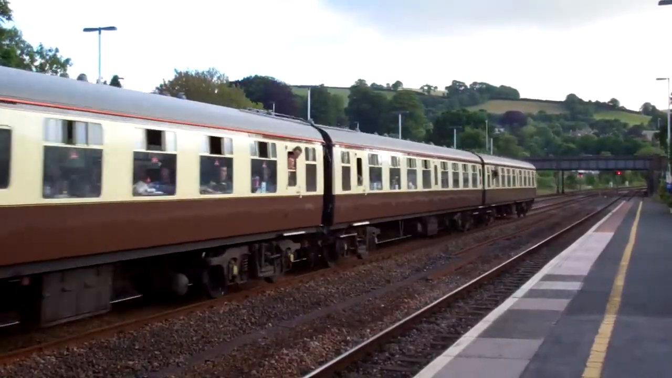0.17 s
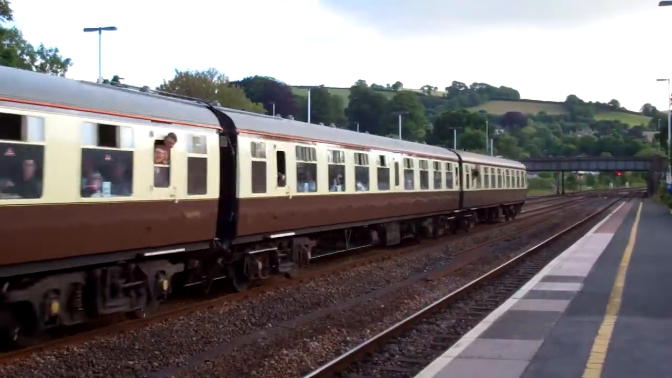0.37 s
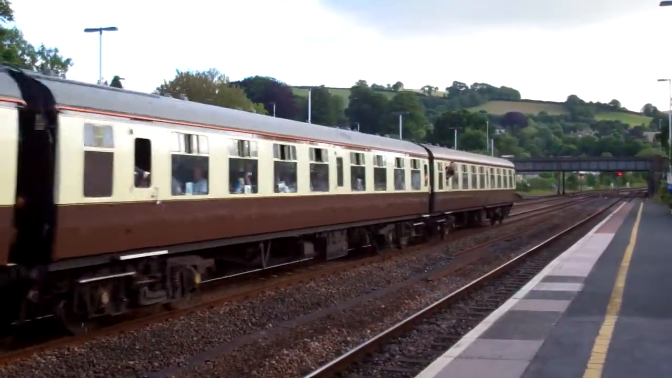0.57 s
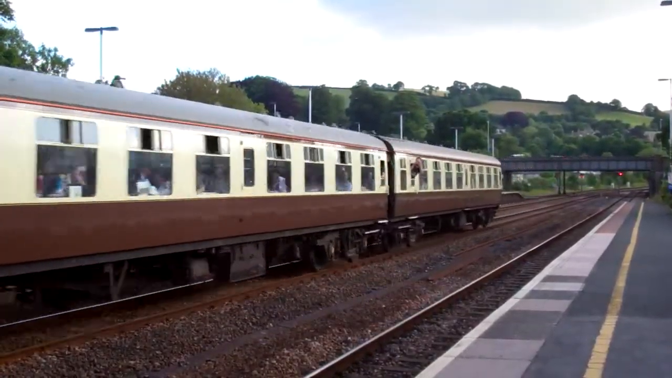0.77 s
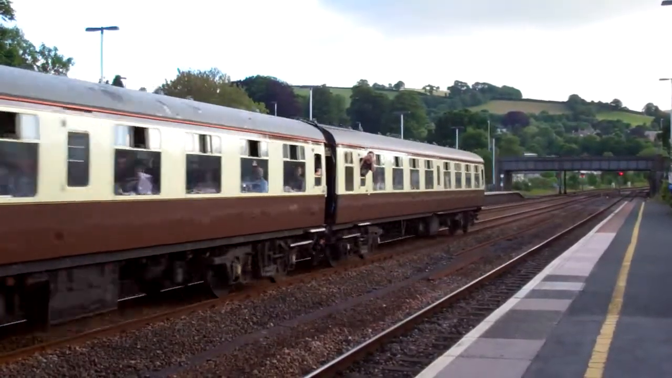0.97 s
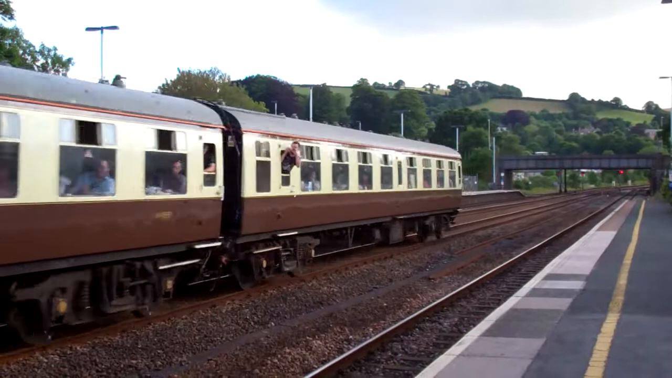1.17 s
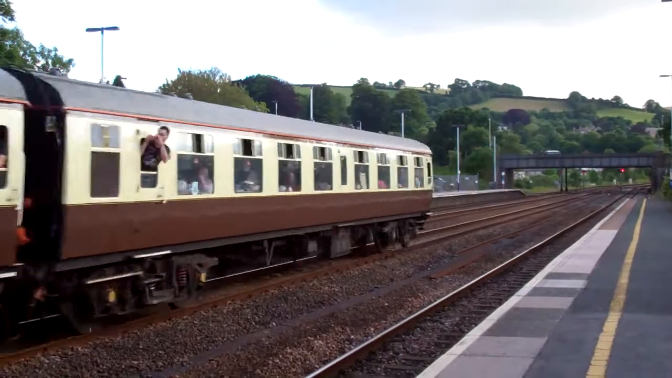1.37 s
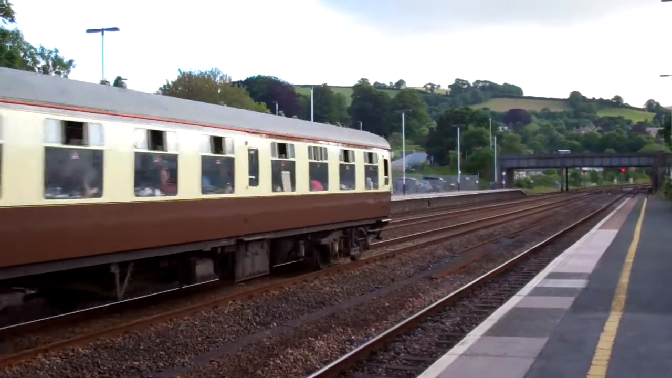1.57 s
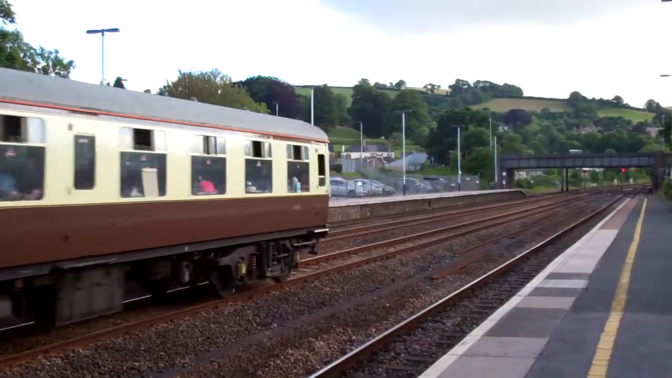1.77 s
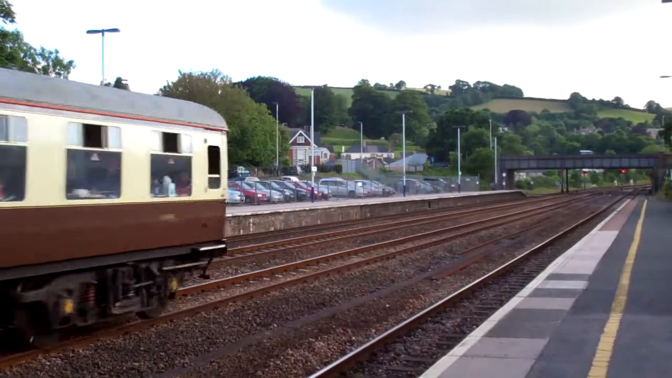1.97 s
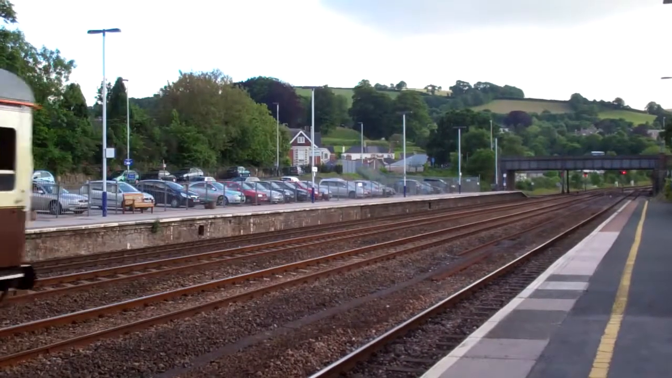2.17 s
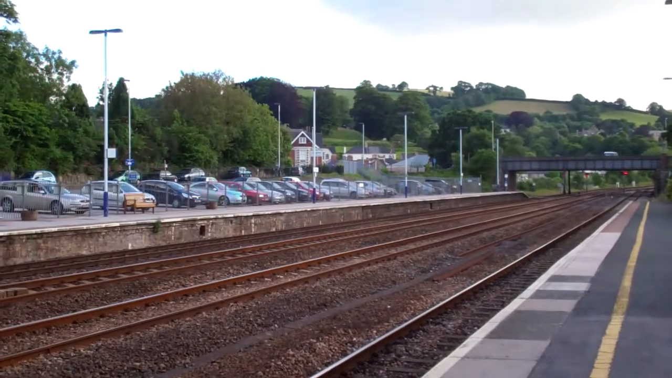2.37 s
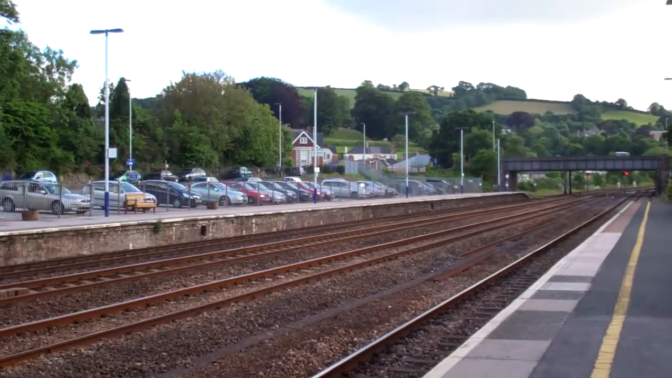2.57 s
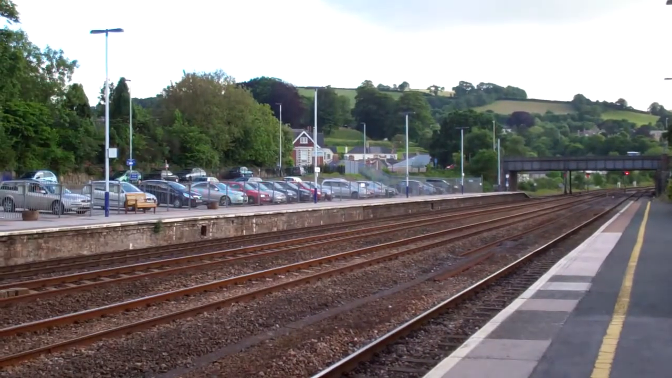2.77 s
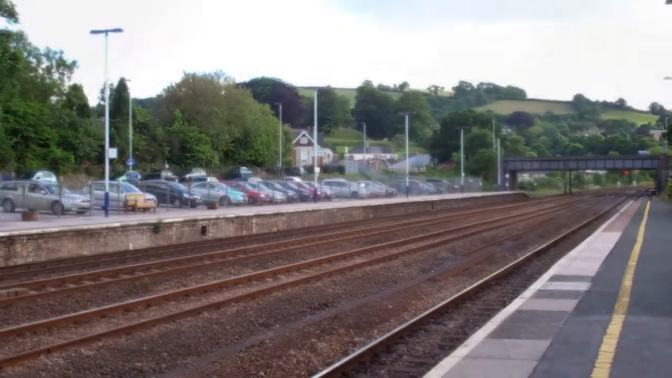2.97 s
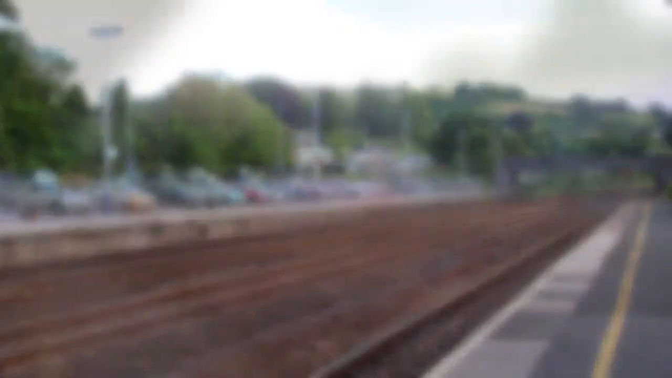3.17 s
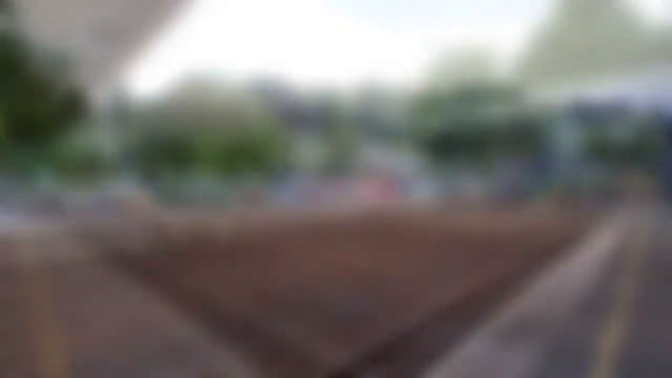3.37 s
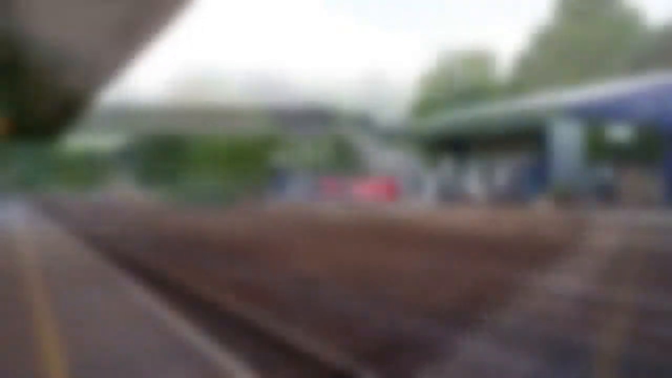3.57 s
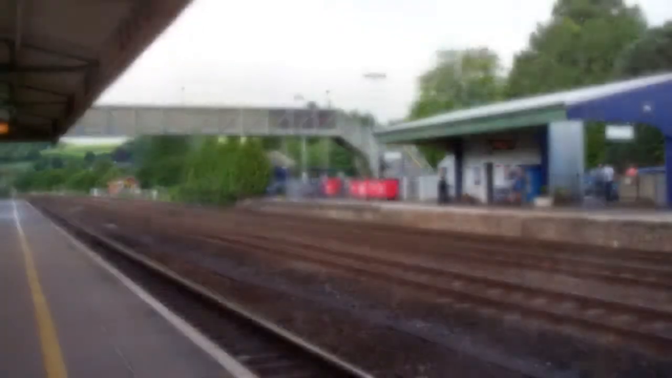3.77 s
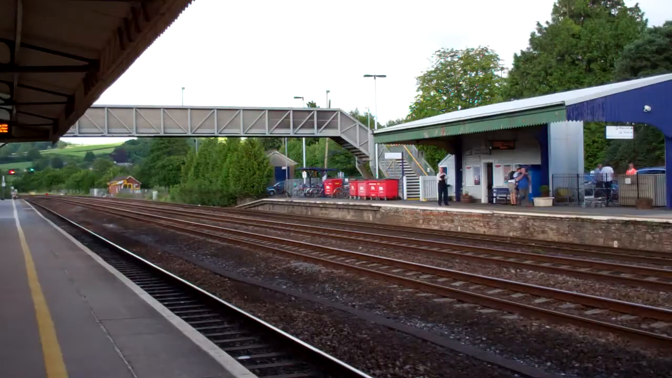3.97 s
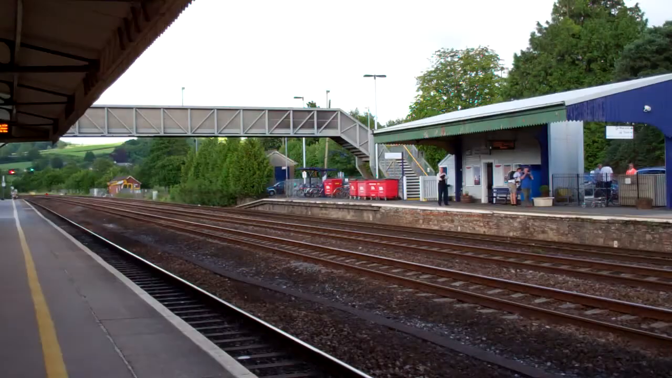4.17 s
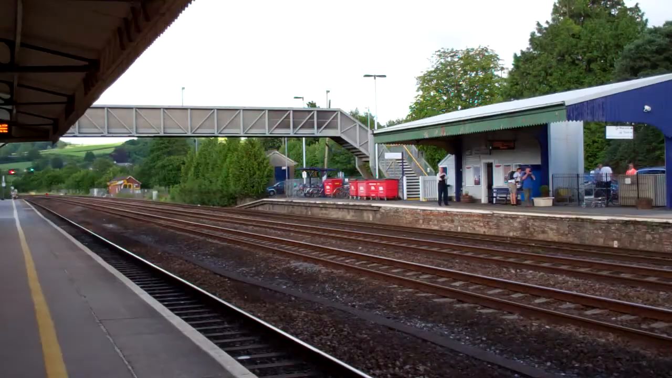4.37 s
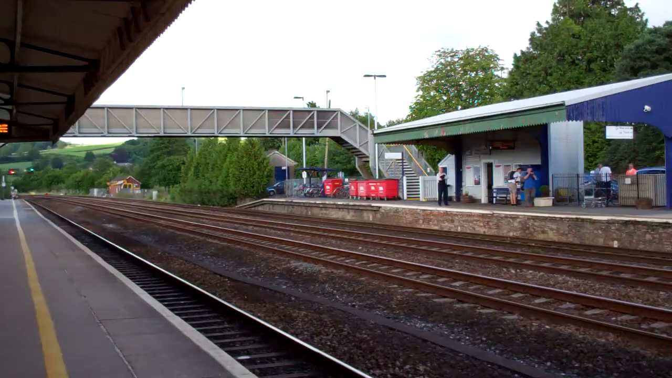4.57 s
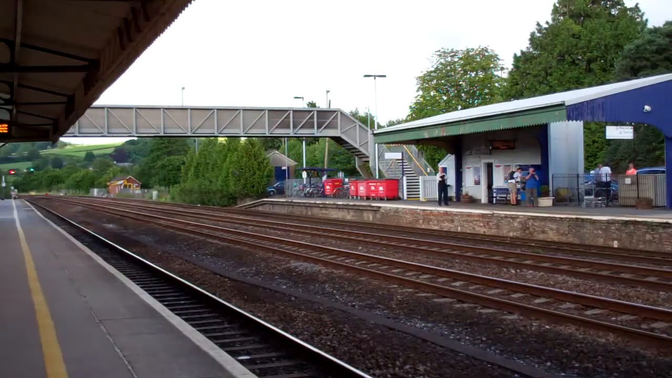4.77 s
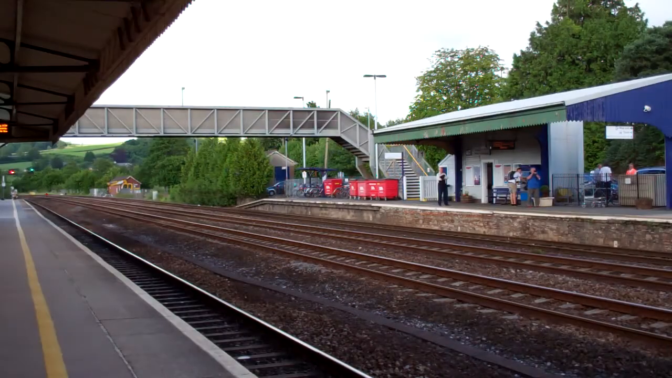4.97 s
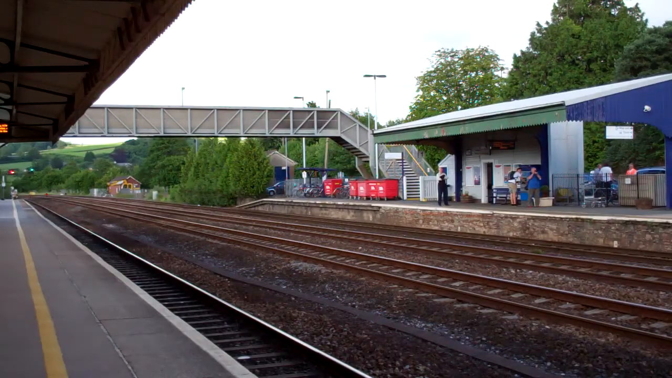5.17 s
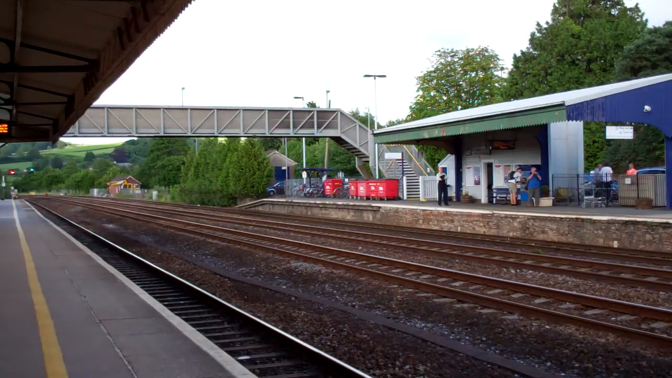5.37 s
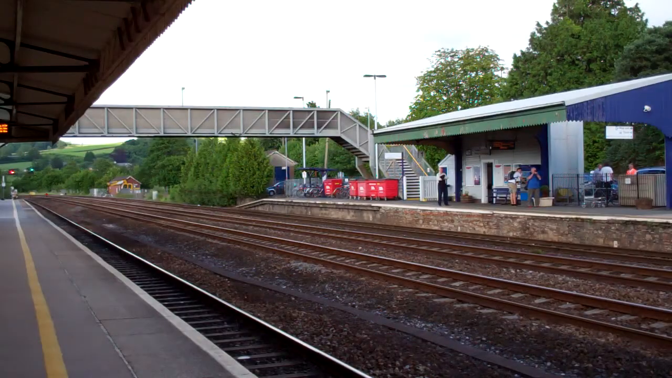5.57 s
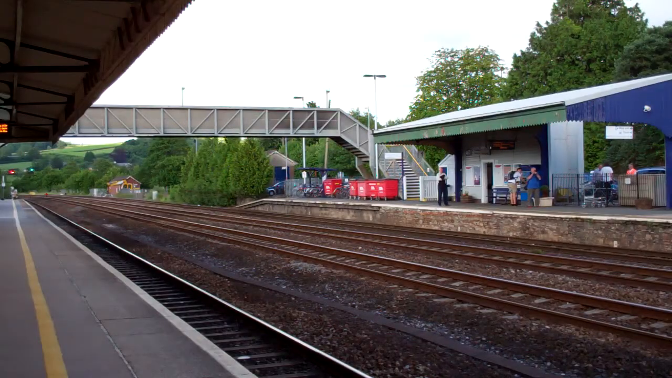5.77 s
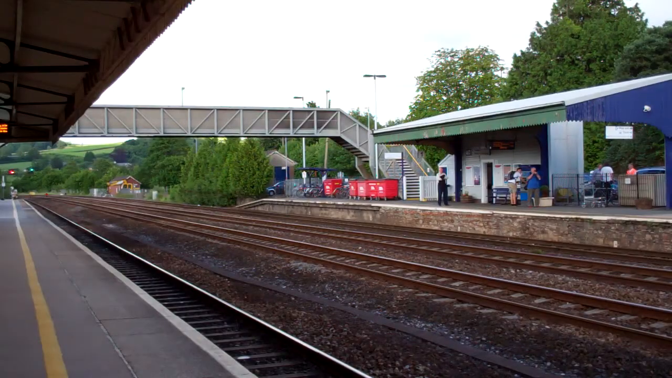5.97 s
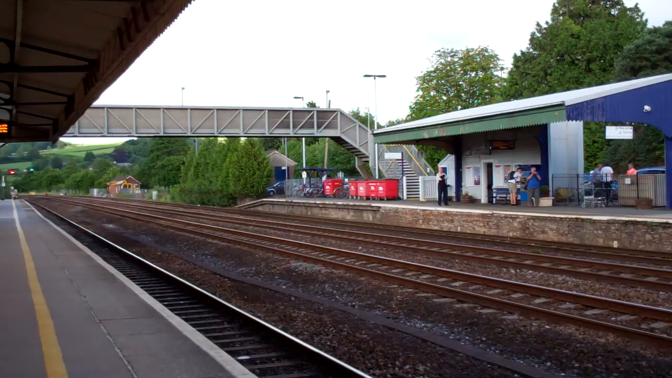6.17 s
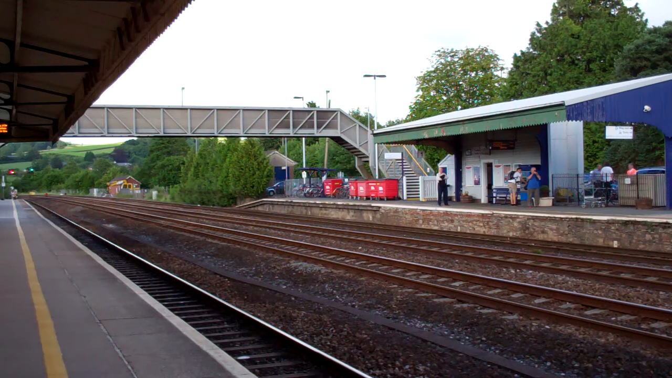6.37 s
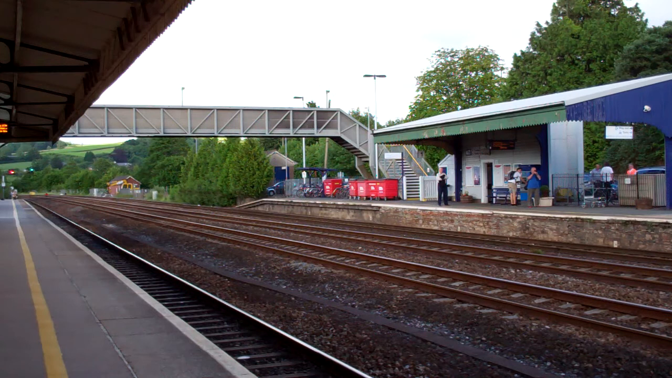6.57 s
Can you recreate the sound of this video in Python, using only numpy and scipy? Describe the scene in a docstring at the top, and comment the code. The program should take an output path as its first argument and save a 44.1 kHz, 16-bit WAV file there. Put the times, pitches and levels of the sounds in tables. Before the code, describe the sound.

At 0 s coaches are already rolling past close by on the left, a loud, rough mid-low roar that wavers as the wheels pass, with the rail singing in swells. Thin, very high flange squeals stutter through it, strongest in the first 0.4 s and around 1.05 and 1.6-1.9 s, with more to about 2.7 s. A faint scrape glides upward at 1.2 s; a wheel clanks on a joint at 2.3 s. From 2.7 s the roar drops, gone by 3.8 s, while high hiss enters, spurting at 3.3-3.8 s. A quieter open station remains: a diesel approaches from the right, its broad roar and low wavering hums growing until the end at 6.6 s. A bird gives two tiny falling notes at 4.3 s. Wind thumps hit the microphone near 5.75 s on the left and again at 5.93 s, with a dull tap and short rustle around 5.88 s.

```python
"""Coaches roll past a platform from the left: noise shaped by rail and wheel modes roars and wavers.
A flange squeals in bursts of ringing noise; a faint scrape glides up, then a wheel clanks on a rail joint.
The train fades as a quiet station dissolves in: a high hiss with spurts, and a diesel nearing from the right,
made of swelling noise and wavering firing tones. A bird drops two short notes; late on come wind pops on
the microphone ports, a dull tap and a brief treble rustle."""
import sys
import numpy as np
from scipy import signal
from scipy.fft import rfft, irfft, next_fast_len
from scipy.io import wavfile
from scipy.ndimage import uniform_filter1d, map_coordinates

SR = 44100
rng = np.random.default_rng(int(sys.argv[2]) if len(sys.argv) > 2 else 0)


def wrap_up_sound(samples):
    """Save the sound to the file named by the first command line argument, as 16-bit audio."""
    columns = np.atleast_2d(samples).T
    # keep every value between -1 and 1, then stretch to whole-number steps
    tamed = np.clip(columns, -1, 1)
    steps = np.round(tamed * 32767).astype(np.int16)
    wavfile.write(sys.argv[1], SR, steps)


N = 291501
TIME_S = np.arange(N) / SR
LEFT_RIGHT = np.array([[1], [-1]])  # a positive pan in dB lifts the left and lowers the right


def amp(db):
    """dB to gain."""
    return 10 ** (np.asarray(db) / 20)


def unit(x):
    """Scaled to rms 1."""
    return x / np.sqrt(np.mean(x ** 2) + 1e-20)


def along(points, hz):
    """Values between (Hz, value) points, read on a log frequency axis."""
    point_hz, values = np.transpose(points)
    return np.interp(np.log(hz + 1), np.log(point_hz + 1), values)


def curves(rows):
    """One value per sample for each column after the time."""
    seconds, *columns = np.transpose(rows)
    return [np.interp(TIME_S, seconds, column) for column in columns]


def ramp(span):
    """0 before the span in seconds, 1 after it."""
    return np.interp(TIME_S, span, [0, 1])


def wobble(rate):
    """A smooth random curve, rate knots a second."""
    knots = rng.standard_normal(int(N * rate / SR) + 4)
    return map_coordinates(knots, [np.arange(N) * rate / SR])


def filtered(x, response):
    """x times a complex response of frequency."""
    size = next_fast_len(N + 8192)
    spectrum = rfft(x, size) * response(np.fft.rfftfreq(size, 1 / SR))
    return irfft(spectrum, size)[..., :N]


def ports(pair, lag):
    """The left port hears the treble lag seconds after the right; the bass reaches both nearly in step."""
    def response(hz):
        turn = np.pi * hz * lag / (1 + (1000 / (hz + 1)) ** 3)
        return np.exp(-1j * turn * LEFT_RIGHT)
    return filtered(pair, response)


def rush(gain, alike, patchy_db):
    """Stereo noise of rms 1 with time-frequency patches of random gain; alike sets left-right likeness."""
    grains = signal.stft(rng.standard_normal((2, N)), nperseg=512)[2]
    field = uniform_filter1d(rng.standard_normal(grains.shape[1:]), size=5, axis=0)
    field = uniform_filter1d(field, size=8, axis=1)
    pair = signal.istft(grains * amp(patchy_db * unit(field)), nperseg=512)[1][:, :N]

    def mid_side(hz):
        turn = np.arccos(np.clip(along(alike, hz), -1, 1)) / 2
        return gain(hz) * np.array([np.cos(turn), np.sin(turn)])
    mid, side = filtered(pair, mid_side)
    return unit(np.array([mid + side, mid - side]))


def resonant(spectrum, modes, part):
    """Gain of one part of a spectrum, lifted at each mode; neighbouring parts share their edge."""
    low_hz, high_hz = part

    def gain(hz):
        lift = sum(db / (1 + (2 * (hz - centre) / width) ** 2) for centre, width, db in modes)
        share = 1 / (1 + (low_hz / (hz + 1)) ** 12) / (1 + (hz / high_hz) ** 12)
        return amp(along(spectrum, hz) + lift) * np.sqrt(share)
    return gain


def slow_band(pair, width_hz, carrier):
    """Two slow noises on a complex carrier make a narrow band of rms 1 around its pitch."""
    slow = filtered(pair, lambda hz: 1 / (1 + (hz / width_hz) ** 2))
    return unit(np.real((slow[0] + 1j * slow[1]) * carrier))


def tone(hz, waver_hz, waver_db):
    """A sine of rms near 1 whose pitch and strength drift."""
    strength = np.sqrt(2) * amp(waver_db * wobble(8.3))
    return strength * np.sin(2 * np.pi * np.cumsum(hz + waver_hz * wobble(12)) / SR)


# Level of the high hiss: time_s, level_db
SIZZLE_LEVEL = [(2.7, -52), (3.15, -44), (3.9, -46.5), (4.9, -45.5), (6.1, -40.5), (6.61, -41)]
# Colour of the steady hiss: pitch_hz, density_db (per Hz)
SIZZLE_COLOUR = [(9000, -30), (11000, -12), (11700, -6), (12300, -9), (12800, -2.5), (13300, -2),
                 (13750, 0), (14300, -1), (14600, -80)]
# Spurts of hiss: start_s, length_s, level_db
SPURTS = [(3.3, .06, -44), (3.385, .05, -40.5), (3.445, .09, -40.5), (3.6, .02, -41), (3.62, .045, -39),
          (3.73, .05, -44)]
# Colour of the spurts: pitch_hz, density_db (per Hz)
SPURT_COLOUR = [(10000, -30), (12300, -14), (12700, 0), (14300, 0), (14600, -80)]


def sizzle():
    """A steady hiss at the top of the range, stronger on the right, with quick spurts that die away."""
    hiss, spit = (rush(lambda hz: amp(along(colour, hz)), [(13000, .35)], patchy_db=.9)
                  for colour in (SIZZLE_COLOUR, SPURT_COLOUR))
    spurts = sum(amp(db) * (TIME_S > s) * np.exp(-((TIME_S - s) / length) ** 4) for s, length, db in SPURTS)
    flicker_db = .8 * wobble(80)
    return (amp(curves(SIZZLE_LEVEL)[0]) * hiss + spurts * spit) * amp(flicker_db - 1.6 * LEFT_RIGHT)


# A brief broad rustle: centre_s, half_length_s, level_db
RUSTLE = (5.89, 0.033, -43)


def scuff():
    """A short swell of treble noise."""
    s, half_length, db = RUSTLE
    swell = amp(db) * np.exp(-((TIME_S - s) / half_length) ** 2)
    colour = [(1500, -30), (3000, 2), (9500, -6), (11000, -30)]  # pitch_hz, density_db
    return swell * rush(lambda hz: amp(along(colour, hz)), [(5000, .3)], patchy_db=4)


# Wind on a port: centre_s, level_db, port (1 left, -1 right), overshoot_rad
WIND_POPS = [(5.721, -23, -1, .3), (5.75, -11.5, 1, 0.29), (5.858, -24, 1, 0.33), (5.9312, -9, 1, 0.69)]


def wind_pops():
    """An eddy pulls one membrane back and lets it overshoot."""
    out = np.zeros((2, N))
    half = SR // 100
    t = np.arange(-half, half) / SR
    for s, db, port, overshoot in WIND_POPS:
        push = -np.cos(2 * np.pi * 200 * t + overshoot) * np.exp(-(t / 0.0024) ** 2)
        reach = np.array([[1], [.08]])[::int(np.sign(port))]  # the other port feels little of it
        out[:, round(s * SR) - half:][:, :len(t)] += amp(db) * push * reach
    return out


# Falling notes: start_s, length_s, from_hz, to_hz, level_db
BIRD_NOTES = [(4.315, .04, 2750, 2300, -46), (4.375, .04, 2550, 2450, -48)]


def bird():
    """Short falling whistles, each swelling and fading as half a sine."""
    out, t = np.zeros(N), np.arange(SR // 10) / SR
    for s, length, from_hz, to_hz, db in BIRD_NOTES:
        u = np.clip(t / length, 0, 1)
        whistle = np.sin(2 * np.pi * np.cumsum(from_hz + (to_hz - from_hz) * u) / SR)
        out[round(s * SR):][:len(t)] += amp(db) * np.sin(np.pi * u) * whistle
    return out


# A dull knock: start_s, level_db (before a 7 dB trim), pitch_hz (of the strongest partial)
DULL_TAP = (5.879, -13, 956)


def tap():
    """Four close partials start softly together and die by 60 dB in 52 ms."""
    out, t = np.zeros(N), np.arange(SR // 10) / SR
    s, db, hz = DULL_TAP
    partials = ((.7, .6), (.88, .7), (1, 1.5), (1.1, .5))  # pitch ratio, size
    ring = sum(np.sin(2 * np.pi * hz * ratio * t) * size for ratio, size in partials)
    out[round(s * SR):][:len(t)] += amp(db - 7.0 - 60 * t / 0.052) * ring * (1 - np.exp(-t / .0015))
    return out


# A wheel strikes a rail joint: start_s, level_db, pitch_hz, t60_s
JOINT_BLOW = (2.322, -12, 1300, .15)


def clank():
    """One blow rings the rail web."""
    s, db, hz, t60 = JOINT_BLOW
    t = np.clip(TIME_S - s, 0, None)
    return amp(db - 60 * t / t60) * np.sin(2 * np.pi * hz * t) * (1 - np.exp(-t / 0.0028))


# A faint rising scrape: start_s, length_s, from_hz, to_hz, level_db (at the start of the fade)
RISING_SCRAPE = (1.16, .17, 8600, 9800, -40)


def scrape():
    """A narrow band of friction noise that glides upward and loses 5 dB on top of its swell."""
    s, length, from_hz, to_hz, db = RISING_SCRAPE
    u = np.clip((TIME_S - s) / length, 0, 1)
    carrier = np.exp(2j * np.pi * np.cumsum(from_hz + (to_hz - from_hz) * u) / SR)
    swell = amp(db - 5 * u) * np.sqrt(np.sin(np.pi * u).clip(0))
    return swell * slow_band(rng.standard_normal((2, 2, N)), 150, carrier)


# Roar of the nearing locomotive: time_s, level_db
APPROACH_ROAR = [(3.5, -41), (3.9, -36.5), (4.2, -35.5), (4.9, -33), (5.22, -33), (5.32, -31.5),
                 (5.75, -32), (5.92, -30), (6.45, -28.5), (6.61, -26.5)]
APPROACH_REF_DB = -33  # the roar level at which the layer offsets hold


def approach(offset_db, swing):
    """Level in dB of a layer that grows as the locomotive nears."""
    return APPROACH_REF_DB + offset_db + swing * (curves(APPROACH_ROAR)[0] - APPROACH_REF_DB)


def singing_rail(hz, db, width_hz):
    """A narrow band of noise around the rail's strongest mode."""
    return amp(db) * slow_band(rng.standard_normal((2, N)), width_hz, np.exp(2j * np.pi * hz * TIME_S))


def rail_under_locomotive():
    """The rail sings 12 dB under the reference roar and grows 2.2 times as fast in dB as the roar."""
    return singing_rail(934, approach(-12, swing=2.2), width_hz=87)


# Colour of the locomotive noise: pitch_hz, density_db (per Hz)
NEARING_COLOUR = [(15, -57), (30, -31), (100, -12), (160, -17.5), (300, -16), (550, -9.5), (750, -6.5),
                  (1000, -9.5), (1400, -12.5), (2000, -12), (2700, -16.5), (3500, -20), (5500, -25.5),
                  (9500, -30.5), (13000, -31)]
# Rumble, roar and mid hiss: low_hz, high_hz
NEARING_BANDS = [(0, 400), (400, 1500), (1500, 11500)]
# The same three layers: offset_db (against the roar), swing (against the roar's)
NEARING_LAYERS = [(-6.5, 0.79), (0, 0.94), (-8, 0.86)]
# Stereo width: pitch_hz, likeness (left to right, 1 is the same)
NEARING_LIKENESS = [(40, .8), (170, .98), (690, .92), (1030, .83), (1400, .55), (2000, .3), (6000, .22),
                    (12000, .35)]
# Resonances of the locomotive: pitch_hz, width_hz, lift_db
BODY_MODES = [(960, 150, 3), (1463, 25, 7), (2600, 500, 3), (6830, 420, 9)]
# The low hum wavers: time_s, level_db
LOW_HUM = [(3.5, -64), (4.15, -55), (4.27, -46), (4.95, -42), (5.25, -37), (5.4, -47), (5.7, -41.5),
           (6.15, -40), (6.38, -54), (6.61, -41)]
# The upper hum wavers: time_s, level_db
FIRING_HUM = [(3.4, -50.5), (3.83, -39), (4.03, -51), (4.12, -42), (4.5, -47), (5, -38.5), (5.28, -45),
              (5.42, -41.5), (5.65, -37), (5.8, -43), (5.92, -32), (6.01, -45), (6.1, -32.5), (6.35, -36),
              (6.43, -52), (6.52, -30.5), (6.61, -33)]
# Weaker hums: pitch_hz, level_db (against the rumble)
WEAK_HUMS = [(101, -29), (128, -33.5), (203, -11), (218, -7), (292, -10.5)]
LOW_HZ, FIRING_HZ = 114, 245.7


def diesel():
    """Broad engine and track noise with the strong firing orders as wavering tones."""
    levels = [approach(*row) for row in NEARING_LAYERS]
    patchy_db, pan_db = [.5, .7, .9], [.15, .45, .2]
    sound = 0
    for db, band, patch, pan in zip(levels, NEARING_BANDS, patchy_db, pan_db):
        noise = rush(resonant(NEARING_COLOUR, BODY_MODES, band), NEARING_LIKENESS, patch)
        sound = sound + amp(db + pan * LEFT_RIGHT) * noise
    for hz, rows in ((LOW_HZ, LOW_HUM), (FIRING_HZ, FIRING_HUM)):
        sound = sound + amp(curves(rows)[0]) * tone(hz, waver_hz=1.15, waver_db=.6)
    for hz, db in WEAK_HUMS:
        sound = sound + amp(levels[0] + db) * tone(hz, waver_hz=2.68, waver_db=3.0)
    return sound


# Rail song under the coaches: time_s, level_db
COACH_RAIL_LEVEL = [(0, -15), (.5, -18.5), (.9, -29), (1.12, -17), (1.4, -31), (1.65, -19.5), (2.05, -19),
                    (2.7, -36), (3.5, -34)]


def rail_under_coaches():
    """The rail's strongest mode swells and sinks under the coaches, then fades out."""
    return singing_rail(864.7, curves(COACH_RAIL_LEVEL)[0], width_hz=49) * (1 - ramp((3.4, 3.6)))


# Wheel modes of the squeal: pitch_hz, width_hz, level_db
FLANGE_MODES = [(7400, 45, 0), (7465, 80, -1), (7570, 260, -8), (12745, 140, -9.5)]
# Flange on rail: full_s (onset complete), hold_s, level_db
SQUEAL_BURSTS = [(0.018, .04, -33), (0.087, 0.046, -30), (0.194, .06, -33), (0.3, 0.034, -34.5),
                 (0.418, .03, -45), (.49, .03, -44), (0.743, .04, -52), (0.795, .04, -43), (.86, .04, -38),
                 (.96, .04, -42), (1.047, 0.093, -34), (1.18, 0.032, -36.5), (1.357, .08, -44),
                 (1.552, 0.087, -34), (1.666, 0.064, -28.5), (1.773, 0.11, -36), (1.904, 0.064, -36),
                 (2.016, 0.061, -43), (2.215, 0.043, -35), (2.3, 0.039, -39), (2.376, 0.048, -33.5),
                 (2.488, 0.035, -33), (2.58, .05, -43.5), (2.646, 0.023, -38)]
BITE_S, RELEASE_S, GRAZE_DB = .018, .026, -51  # onset, dying away, the faint rub between bursts


def flange():
    """Stick and slip of a flange rings a few lightly damped wheel modes in bursts."""
    def modes(hz):
        power = sum(amp(2 * db) / (1 + (2 * (hz - centre) / width) ** 4) for centre, width, db in FLANGE_MODES)
        return np.sqrt(power)
    bursts = 0
    for s, hold, db in SQUEAL_BURSTS:
        bite = np.clip((TIME_S - s) / BITE_S + 1, 0, 1)
        release = np.exp(-np.clip(TIME_S - s - hold, 0, None) / RELEASE_S)
        bursts = bursts + amp(db) * bite * release
    slips = (bursts + amp(GRAZE_DB)) * amp(2.8 * wobble(90) + 1.5 * wobble(20))
    ringing = rush(modes, [(7400, 0.67)], patchy_db=2.5)
    return slips * ringing * amp(-.7 * LEFT_RIGHT) * (1 - ramp((2.8, 2.95)))


# Colour of the rolling noise: pitch_hz, density_db (per Hz)
ROLLING_COLOUR = [(15, -66), (25, -31), (87, -26.5), (148, -15.5), (252, -18), (385, -10.5), (853, -9.5),
                  (1300, -11.5), (1610, -21), (2460, -17), (3970, -26), (6750, -30), (7510, -35.5),
                  (8130, -33.5), (14200, -39)]
# Underframe rumble, sleeper boom, rail roar, rail web, wheel ring, contact hiss: low_hz, high_hz
ROLLING_BANDS = [(0, 330), (330, 560), (560, 1080), (1080, 1500), (1500, 4000), (4000, 30000)]
# The same six layers: level_db (against the roar), treble_share, rumble_share, boom_share, waver_db (random)
ROLLING_LAYERS = [(-18.5, 0.099, 0.96, 0, 1), (-7.5, 0.031, 0, 0.86, 1), (0, 0.2, 0, 0, 0.98),
                  (-6.5, -0.14, 0, 0.17, -1.5), (-8.5, 1, 0.039, 0, 0.26), (-14.5, 0.68, 0.022, 0, .5)]
# Stereo width: pitch_hz, likeness (left to right, 1 is the same)
ROLLING_LIKENESS = [(40, .75), (80, .88), (170, .94), (345, .92), (690, .84), (1030, .72), (1400, .52),
                    (1750, .35), (2600, .24), (3500, .42), (6700, .1), (14000, .17)]
# Track and wheel modes: pitch_hz, width_hz, lift_db
RAIL_MODES = [(390, 70, 2), (660, 60, 3), (865, 130, 2), (1290, 150, 3), (1750, 60, 4), (2520, 260, 2),
              (5670, 75, 6), (11200, 270, 3)]
# The rake goes by: time_s, roar_db, then tilts that each layer takes by its shares: treble_db, rumble_db, boom_db
RAKE_PASSING = [(0, -14, 2, 2, 1.5), (.35, -12, -2.5, -0.5, -3.5), (.65, -16, 2.5, 3.5, -1.5),
                (.9, -14.5, 1, -4.5, 0.5), (1.2, -14, 0.5, 1.5, 1.5), (1.5, -14, 3, -1.5, -1),
                (1.75, -11.5, -0.5, -5.5, 2.5), (2.05, -13.5, 1, 0.5, 1), (2.3, -14.5, 1.5, -0.5, 0),
                (2.65, -14.5, -2.5, -7, 0), (3, -20, -3, 1, 1.5), (3.25, -21.5, -2.5, -5, 0),
                (3.4, -24, -3.5, -7, -1), (3.55, -27, -1.5, -12, 0), (3.7, -33, -5.5, -8, -6)]
WAVER_KNOTS_PER_S = 7.19


def coaches():
    """Rough wheels on rough rails drive the modes of both; each part's level also wavers at random."""
    roar_db, treble_db, rumble_db, boom_db = curves(RAKE_PASSING)
    patchy_db, pan_db = [.5, .8, .9, .9, .9, 1], [0, 0, 0, 0, .6, 0.6]
    sound = 0
    for layer, band, patch, pan in zip(ROLLING_LAYERS, ROLLING_BANDS, patchy_db, pan_db):
        db, bright, deep, full, waver_db = layer
        tilt_db = bright * treble_db + deep * rumble_db + full * boom_db
        level_db = roar_db + db + tilt_db + waver_db * wobble(WAVER_KNOTS_PER_S)
        noise = rush(resonant(ROLLING_COLOUR, RAIL_MODES, band), ROLLING_LIKENESS, patch)
        sound = sound + amp(level_db + pan * LEFT_RIGHT) * noise
    return sound * (1 - ramp((3.7, 3.82)))


def scene():
    """Train from the left, then the station with its sources on the right."""
    port_lag = 0.00011  # s between the two ports for treble from the side
    train = coaches() + rail_under_coaches() + flange() + scrape() + clank()
    nearing = diesel() + rail_under_locomotive() + tap() + bird()
    station = nearing * ramp((2.85, 3.37)) + sizzle() * ramp((2.5, 2.8)) + scuff()
    return ports(train, -port_lag) + ports(station, port_lag) + wind_pops()


def record(dry):
    """The loudest crests flatten at full scale; nothing is kept from 14200 Hz up."""
    clipped = dry / (1 + np.abs(dry) ** 12) ** (1 / 12)
    return filtered(clipped, lambda hz: hz < 14200)


dry = scene()
out = record(dry)
wrap_up_sound(out)
```